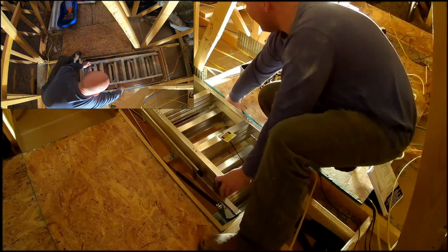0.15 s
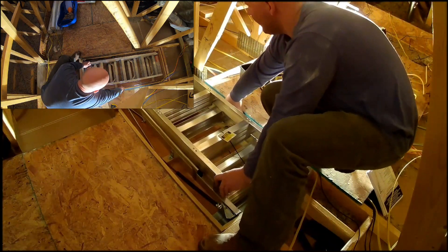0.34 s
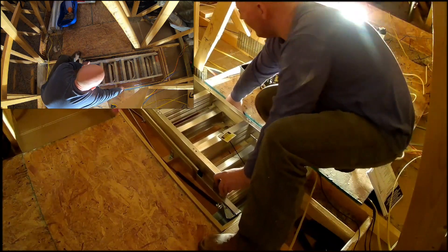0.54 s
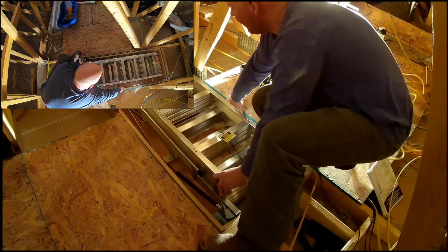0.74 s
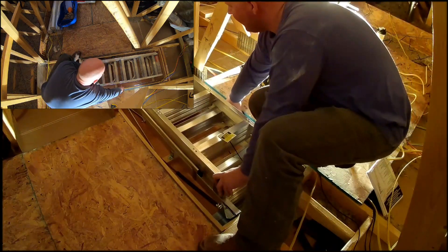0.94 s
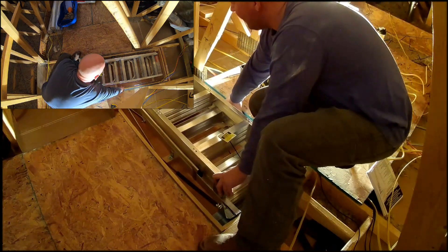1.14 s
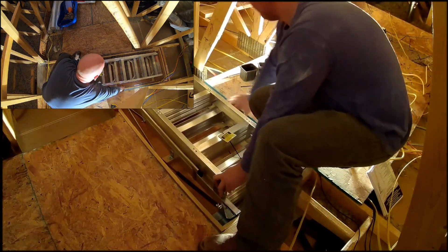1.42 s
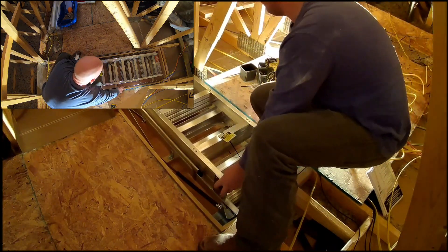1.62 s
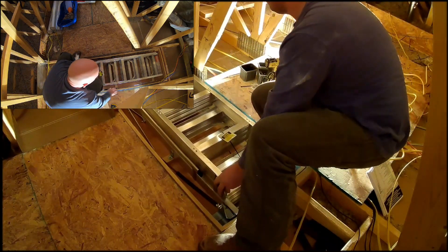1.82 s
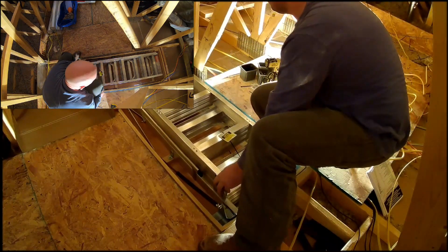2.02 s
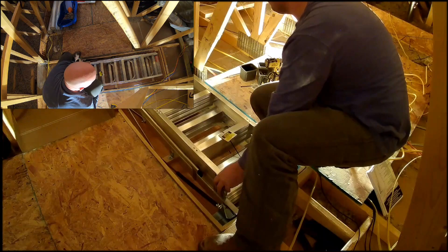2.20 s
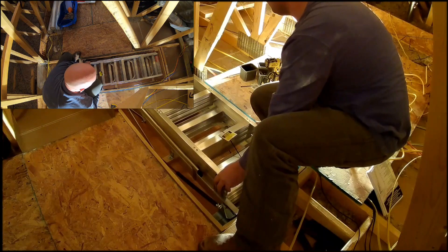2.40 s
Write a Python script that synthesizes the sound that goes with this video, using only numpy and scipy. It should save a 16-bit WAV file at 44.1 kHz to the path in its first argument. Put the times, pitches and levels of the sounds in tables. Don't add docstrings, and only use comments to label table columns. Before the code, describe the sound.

An aluminium ladder is shifted in a wooden attic opening: a heavy booming thud with metallic rattle, a hollow rung clank, a second slightly softer thud, then light taps and scrapes, heard close with faint low hum.

```python
import sys
import numpy as np
from scipy import signal
from scipy.fft import rfft, irfft
from scipy.io import wavfile
from scipy.ndimage import map_coordinates

SR = 44100
rng = np.random.default_rng(int(sys.argv[2]) if len(sys.argv) > 2 else 0)


def boost(x):
    u = np.asarray(x, float) / 20
    return 10 ** u


def unload_wav(signal):
    wavfile.write(
        sys.argv[1],
        SR,
        np.round(np.clip(np.atleast_2d(signal).T, -1, 1) * 32767).astype(np.int16),
    )


N = 112454


def unit(x):
    return x / np.sqrt(np.mean(x ** 2) + 1e-20)


def along(points, hz):
    f, v = np.transpose(points)
    return np.interp(np.log(hz + 1), np.log(f + 1), v)


def wobble(rate, n):
    knots = rng.standard_normal(int(n * rate / SR) + 4)
    return map_coordinates(knots, [np.arange(n) * rate / SR])


def add(total, x, s):
    part = total[:, max(round(s * SR), 0):][:, :x.shape[-1]]
    part += x[..., :part.shape[-1]]


def pair(n, alike):
    a, b = rfft(rng.standard_normal((2, n)))
    likeness = along(alike, np.fft.rfftfreq(n, 1 / SR))
    u = np.arccos(np.clip(likeness, -1, 1)) / 2
    shared, own = np.cos(u) * a, np.sin(u) * b
    return irfft(np.array([shared + own, shared - own]), n)


def coloured(x, spectrum, peaks, peak_db, tilt_db):
    n = x.shape[-1]
    f = np.fft.rfftfreq(n, 1 / SR)
    rings = sum(boost(peak_db) * width / np.hypot(2 * (f - centre), width) for centre, width in peaks)
    colour = boost(along(spectrum, f) + tilt_db * np.log2(f / 2000 + 0.04))
    return unit(irfft(rfft(x) * colour * (1 + rings), n))


def ring(modes, attack_s, waver, share=1, spread_rad=1.7, tilt_db=0):
    hz, db, t60 = np.transpose(modes)[..., None]
    t = np.arange(SR * 3 // 5) / SR
    luck = rng.standard_normal((2, len(modes), 1))
    rate, depth_rad = waver
    knots = np.cumsum(rng.standard_normal((len(modes), 99)), 1)
    drift = depth_rad * np.array([np.interp(t * rate, np.arange(99), k - k[0]) for k in knots])
    level_db = db + tilt_db * np.log2(hz / 60) + 1.5 * luck[0]
    size = boost(level_db - 60 * t / (t60 * share))
    size = size * (1 - np.exp(-t / attack_s)) ** 2
    size = size * np.minimum(20 * (t[-1] - t), 1)
    phase = 2 * np.pi * hz * t + drift
    return np.array([np.sum(size * np.sin(phase + side * spread_rad * luck[1]), 0) for side in (.5, -.5)])


# frequency in Hz, level in dB.
HUM_TONES = [(64.6, -54), (129.2, -48.5), (194, -60), (258, -65)]
# frequency in Hz, level in dB per Hz.
AIR_COLOUR = [(20, -27), (60, -6.5), (135, -4.5), (300, -20), (600, -29.5), (2000, -36), (5000, -47.5),
              (16000, -51.5)]


def background():
    t = np.arange(N) / SR
    hum = np.zeros((2, N))
    for hz, db in HUM_TONES:
        level = np.sqrt(2) * boost(db + 1.5 * wobble(8.56, N))
        drift_rad = 0.5 * np.array([wobble(7.89, N), wobble(7.98, N)])
        hum += level * np.sin(2 * np.pi * hz * t + drift_rad)
    air = coloured(pair(N, [(100, 0.26)]), AIR_COLOUR, [], 0, 0)
    return hum + boost(-48 + wobble(5.35, N)) * air


# start in seconds, boom level in dB, knock level in dB,
# share of the full t60, boom tilt in dB per octave.
FLOOR_BLOWS = [(0, -56.5, -47, 1.6, 12), (0.111, -48, -53, 1.7, 5), (0.223, -13.5, -15.5, 0.95, .5),
               (0.283, -21, -38, 1.08, -3.5), (0.409, -31.5, -56, 0.92, -4.5),
               (.63, -33.5, -43, 0.52, -2.5), (0.799, -50.5, -51.5, 1.3, 1.5), (.961, -18, -25.5, 0.95, 1),
               (1.039, -27, -44, 1.17, -2.5), (1.149, -39.5, -50.5, 1.4, 1), (1.33, -43, -53, 1.17, -1),
               (1.79, -64, -49, 0.87, .5), (2.251, -42, -50, 0.64, 8), (2.299, -45, -66, 0.7, 5.5),
               (2.375, -46.5, -58, 0.76, 0), (2.47, -54, -68, .6, -6)]
# frequency in Hz, level in dB, t60 in seconds.
DECK_MODES = [(29.45, 1.5, 0.63), (38.28, -1, 0.98), (46.93, 3.5, 0.55), (59.06, 0.5, 0.87),
              (71.8, -1.5, 0.54), (88.2, -2, 0.85), (102.5, -1.5, 0.45), (133, -13.5, 0.33),
              (169.4, -6.5, 0.41)]
# frequency in Hz, level in dB, t60 in seconds.
BOARD_MODES = [(206.7, -2, .2), (249.8, -3.5, 0.29), (309.8, 0.5, 0.22), (371.8, -3.5, 0.19),
               (450.8, -3.5, 0.19), (598, -4.5, 0.19), (739.5, -4.5, 0.19), (823, -3, 0.11)]


def thuds():
    lead_s = 0.00897
    out = np.zeros((2, N))
    for s, boom_db, knock_db, share, tilt_db in FLOOR_BLOWS:
        boom = ring(DECK_MODES, 0.0028, (14, .6), share, tilt_db=tilt_db)
        knock = ring(BOARD_MODES, 0.004, (70, 1.4), share, spread_rad=0.43)
        add(out, boost(boom_db) * boom, s)
        add(out, boost(knock_db) * knock, s - lead_s)
    return out


LUMPS_PER_S = 220
# frequency in Hz, left-right likeness from 0 to 1.
LADDER_ALIKE = [(300, 0.78), (2000, 0.49), (5000, 0.86), (9000, 0.23)]
# frequency in Hz, width in Hz.
RAIL_RINGS = [(735, 38), (1310, 20), (1790, 30), (2150, 23), (2800, 41), (3700, 51), (5100, 81)]
# frequency in Hz, share of the t60.
CHATTER_FADE = [(300, 1.33), (2000, 0.78), (5000, 0.72), (12000, 0.56)]


def chatter(contacts, colour):
    pan_db, attack_s, lumpy_db = -2, 0.0008, 2
    out = np.zeros((2, N))
    t = np.arange(SR * 2 // 5) / SR
    for s, db, hold_s, t60, tilt_db in contacts:
        rattle = coloured(pair(len(t), LADDER_ALIKE), colour, RAIL_RINGS, 5, tilt_db)
        hz, frame_s, z = signal.stft(rattle, SR, nperseg=256)
        band_t60 = t60 * along(CHATTER_FADE, hz)[:, None]
        z = z * boost(-60 * np.maximum(frame_s - hold_s, 0) / band_t60)
        x = signal.istft(z, SR, nperseg=256)[1][:, :len(t)]
        level = boost(db + lumpy_db * wobble(LUMPS_PER_S, len(t)))
        add(out, x * level * (1 - np.exp(-t / attack_s)), s)
    return out * boost([[pan_db / 2], [-pan_db / 2]])


# start in seconds, level in dB, chatter length in seconds,
# t60 in seconds, tilt in dB per octave.
LIGHT_TAPS = [(0, -43.5, 0.013, 0.39, -1), (.118, -50, 0.028, 0.9, -3), (.371, -40, 0.014, 0.19, -6.5),
              (.619, -47, 0.0084, 0.072, 1), (.627, -26.5, 0.004, 0.23, 2), (.644, -37, 0.017, 0.33, -.5),
              (.936, -45.5, .015, 0.28, -5), (1.144, -41.5, .006, 0.27, 5), (1.190, -45, .008, 0.21, 5),
              (1.215, -46.5, 0.013, 0.5, -3.5), (1.283, -54.5, 0.056, 0.43, -1.5),
              (1.565, -64.5, 0.014, 0.15, -8), (1.758, -47.5, 0.025, 0.97, -5.5),
              (1.844, -49, .004, 0.33, 4), (2.212, -39, 0.0087, 0.3, 0), (2.248, -45, 0.032, 0.22, -6.5),
              (2.468, -48, 0.014, 0.4, -1.5)]
# frequency in Hz, level in dB per Hz.
CLICK_COLOUR = [(250, -18.5), (700, -8.5), (1200, -6), (2300, -2.5), (3500, -8.5), (5000, -17.5),
                (9000, -19), (16000, -39)]


def taps():
    return chatter(LIGHT_TAPS, CLICK_COLOUR)


# start in seconds, level in dB, chatter length in seconds,
# t60 in seconds, tilt in dB per octave.
HEAVY_KNOCKS = [
    (.211, -26.5, 0.011, .15, -6.5),
    (.2225, -18.5, 0.025, 0.21, 1.5),
    (.252, -23, 0.029, 0.19, 0),
    (.290, -37.5, 0.018, 0.63, -1.5),
    (.949, -32, 0.01, .15, -5.5),
    (.9615, -21, 0.0087, 0.23, 1.5),
    (.978, -22, .01, 0.23, 1.5),
    (1.005, -29, 0.026, 0.21, 0.5),
]
# frequency in Hz, level in dB per Hz.
RATTLE_COLOUR = [(90, -16.5), (200, 8.5), (700, 1), (1300, -2.5), (2200, 0), (4300, -13), (9000, -17),
                 (16000, -15.5)]


def knocks():
    return chatter(HEAVY_KNOCKS, RATTLE_COLOUR)


# start in seconds, length in seconds, level in dB,
# tilt in dB per octave.
DRAG_STROKES = [
    (0.482, 0.097, -44, -0.5),
    (0.704, 0.18, -48.5, 0.5),
    (.79, 0.11, -47, -1.5),
    (0.852, 0.12, -47.5, 0),
    (1.303, 0.25, -57, -3),
    (1.856, 0.38, -54.5, 4.5),
    (2.049, 0.1, -40.5, 1),
    (2.107, 0.12, -47.5, -3.5),
    (2.293, 0.16, -52.5, -.5),
]
# frequency in Hz, level in dB per Hz.
DRAG_COLOUR = [(400, -45), (900, -13), (1700, -5), (2900, -13), (3700, -22.5), (8000, -23), (16000, -40)]
# frequency in Hz, width in Hz.
RUBBED_RINGS = [(1486, 32), (1760, 26), (2050, 35), (2500, 33), (3050, 57), (4050, 58), (6030, 40)]


def scrapes():
    out = np.zeros((2, N))
    for s, length, db, tilt_db in DRAG_STROKES:
        u = np.arange(round(2 * length * SR)) / (length * SR)
        shape = np.minimum(u / 0.34, 1) * np.exp(-2.2 * u ** 2)
        rub = coloured(pair(len(u), LADDER_ALIKE), DRAG_COLOUR, RUBBED_RINGS, 6, tilt_db)
        add(out, rub * shape * boost(db + 2 * wobble(LUMPS_PER_S, len(u))), s)
    return out


# start in seconds, level in dB.
CLANK_HITS = [
    (.626, -28.5),
    (.642, -25),
    (.682, -59),
]
# frequency in Hz, level in dB, t60 in seconds.
RUNG_MODES = [(888, -7.5, 0.33), (1654, 2, 0.19), (2040, -12, 0.21), (2240, 0, 0.18), (2330, -9, 0.19),
              (2870, -0.5, 0.089), (3060, 5, 0.15), (4370, -27, 0.12)]


def clank():
    out = np.zeros((2, N))
    for s, db in CLANK_HITS:
        strike = ring(RUNG_MODES, 0.0018, (140, 1.1), 0.79)
        add(out, boost(db) * strike * boost([[-1.6], [1.6]]), s)
    return out


# frequency in Hz, level in dB, t60 in seconds.
SPRING_MODES = [(5650, -3, .14), (6770, 3, 0.2), (7430, 0, 0.15), (9350, 1, 0.12), (10500, -1.5, .12)]


def tink():
    out = np.zeros((2, N))
    add(out, boost(-54) * ring(SPRING_MODES, 0.00091, (60, .5)), 1.8445)
    return out


# start in seconds, length in seconds, level in dB, frequency in Hz.
HINGE_SQUEAKS = [
    (2.245, 0.032, -56.5, 9540),
    (2.283, 0.065, -64.5, 9550),
]


def squeaks():
    out = np.zeros((2, N))
    for s, length, db, hz in HINGE_SQUEAKS:
        t = np.arange(round(length * SR)) / SR
        tone = np.sin(2 * np.pi * hz * t + 0.5 * wobble(120, len(t)))
        shape = np.sin(np.pi * t / length) ** 0.32
        level = boost(db + 3.3 * wobble(134, len(t)))
        add(out, level * shape * tone * np.ones((2, 1)), s)
    return out


def attic(x):
    t60, top_hz = 0.62, 4500
    t = np.arange(SR) / SR
    fading = rng.standard_normal((2, SR)) * boost(-60 * t / t60)
    tail = signal.lfilter(*signal.butter(1, top_hz / (SR / 2)), fading)
    tail = tail / np.linalg.norm(tail[0])
    return signal.fftconvolve(x.mean(0)[None], tail, axes=1)[:, :N]


def scene():
    ladder = taps() + knocks() + scrapes() + clank() + tink() + squeaks()
    return background() + thuds() + ladder + boost(-22) * attic(ladder)


# frequency in Hz, level in dB.
MIC_RESPONSE = [(8, -32), (22, 0.5), (9300, 0), (10300, -7), (11300, -21.5), (13500, -27), (15500, -32)]


def microphone(x):
    response = boost(along(MIC_RESPONSE, np.fft.rfftfreq(N, 1 / SR)))
    return irfft(rfft(x) * response, N)


def band_limit(x):
    return signal.sosfilt(signal.butter(12, 15750, fs=SR, output="sos"), x)


def record(dry):
    mix = microphone(dry)
    return band_limit(mix)


dry = scene()
out = record(dry)
unload_wav(out)
```